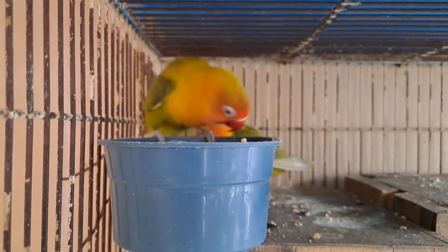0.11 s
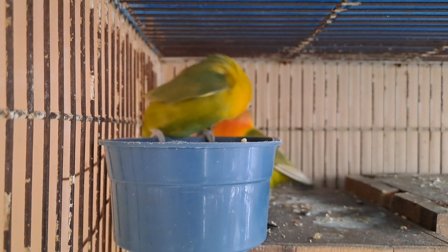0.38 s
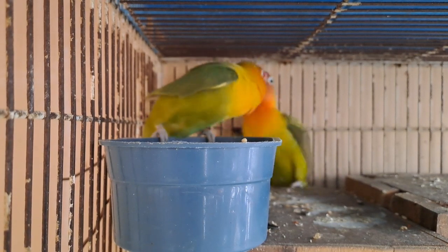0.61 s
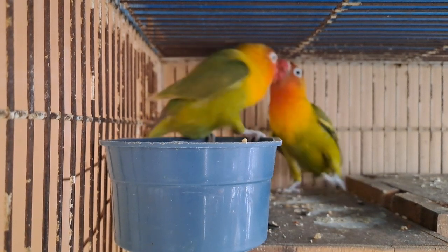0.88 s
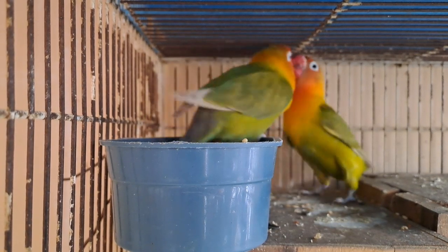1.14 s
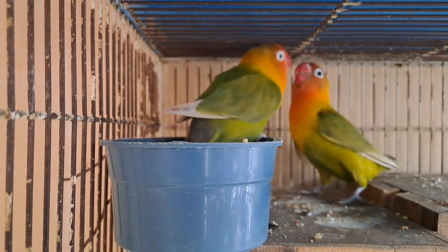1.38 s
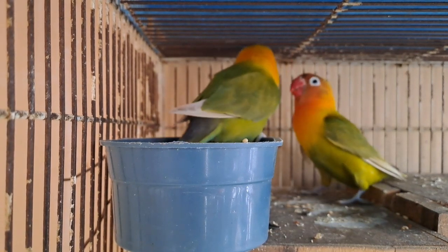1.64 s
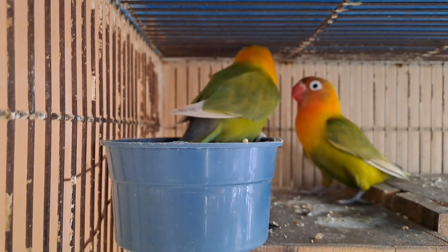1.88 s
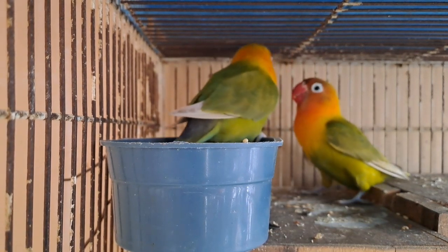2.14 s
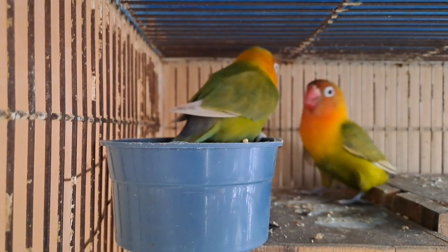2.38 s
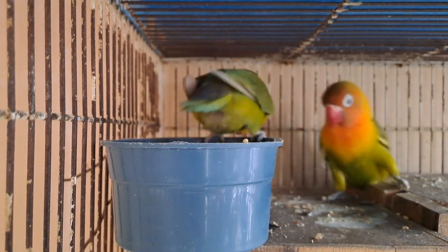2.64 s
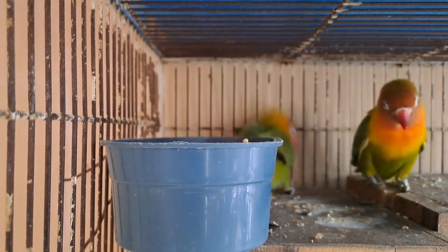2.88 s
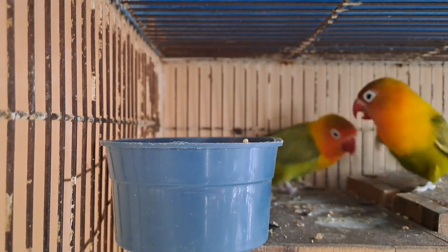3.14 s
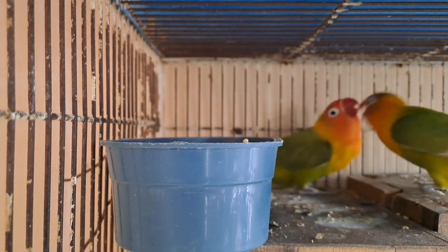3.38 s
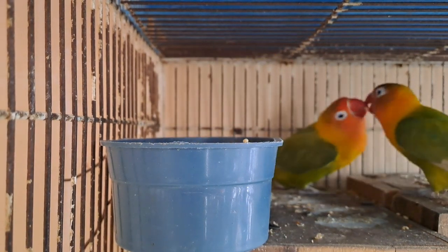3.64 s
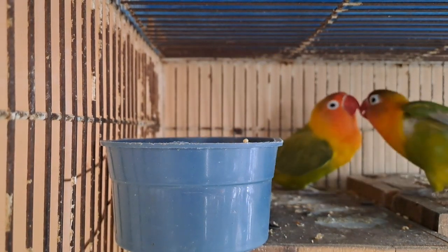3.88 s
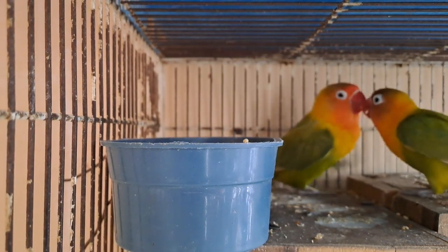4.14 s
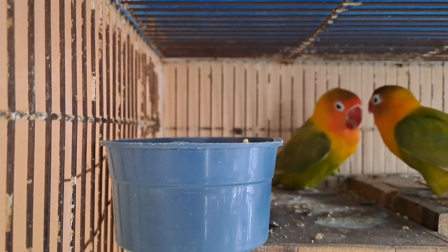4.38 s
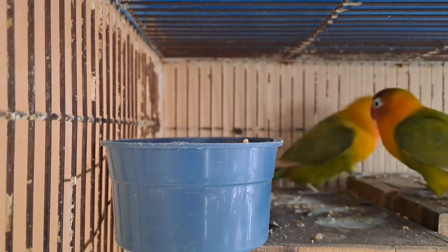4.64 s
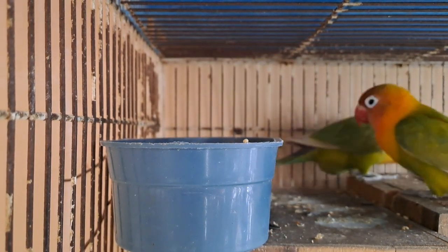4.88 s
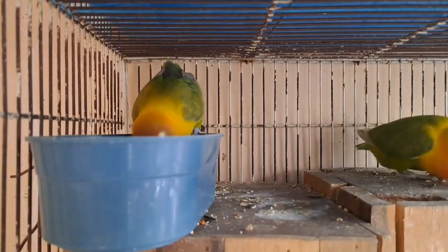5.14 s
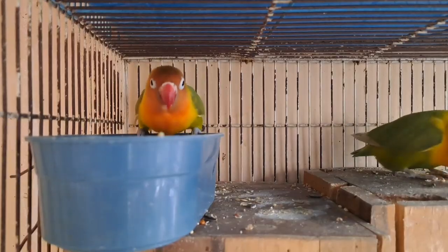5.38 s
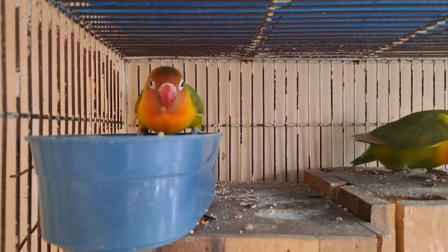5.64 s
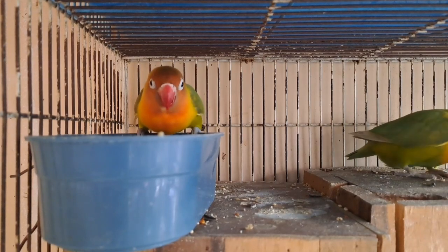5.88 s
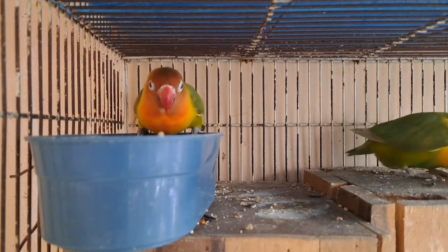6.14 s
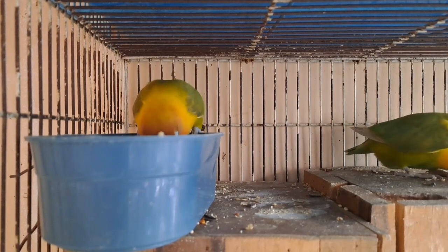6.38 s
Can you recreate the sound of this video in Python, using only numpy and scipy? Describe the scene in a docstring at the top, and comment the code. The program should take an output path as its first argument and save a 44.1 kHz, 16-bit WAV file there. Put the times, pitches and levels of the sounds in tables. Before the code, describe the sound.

Bright, piercing parrot chirps and four quick screeches ring in a small hard cage, giving way to scuffling feet and crisp seed cracking.

```python
"""Small parrots chatter in a wire cage under a hard roof: gliding chirps, rasping screeches, and closing notes
that ring on as echo. Each call is a harmonic series on a moving fundamental; roughness modulates it and adds noise.
Close reflections and a diffuse echo tail follow. Claws, feet, feathers and husks tick as decaying bands of noise.
Faint far whistles are narrowband noise, over a low rumble, rustle and hiss of filtered noise with slow levels."""
import sys
import numpy as np
from scipy import signal
from scipy.fft import rfft, irfft
from scipy.io import wavfile
from scipy.ndimage import uniform_filter1d

SR = 44100
rng = np.random.default_rng(int(sys.argv[2]) if len(sys.argv) > 2 else 0)


def invert_db(level):
    """Linear amplitude ratio for a level in decibels (20 dB per decade), elementwise."""
    return 10 ** (np.asarray(level, dtype=float) / 20)


def generate_wav(signal):
    """Clip the signal to [-1, 1] and save it as 16-bit WAV at the path in sys.argv[1]."""
    frames = np.transpose(np.atleast_2d(signal))
    scaled = np.clip(frames, -1, 1) * 32767
    pcm = np.round(scaled).astype(np.int16)
    wavfile.write(sys.argv[1], SR, pcm)


N = 287091  # samples, about 6.5 s

# rasping screeches, about a third of a second apart: (time [s], length [s], top pitch [Hz],
# reference level [dB], share of the length at the top [0-1], last pitch [Hz])
SCREECHES = [(1.514, 0.14, 3640, -15.5, 0.33, 3550), (1.876, 0.12, 3680, -15.5, 0.52, 2950),
             (2.191, .125, 3860, -16, .52, 3150), (2.532, 0.125, 3760, -13.5, 0.41, 3213)]


def at_hz(points, hz):
    """Spectral interpolation: levels run straight along a logarithmic frequency axis."""
    points = np.array(points)
    return np.interp(np.log(hz + 1), np.log(points[:, 0]), points[:, 1])


def rms_one(x):
    """Normalization to unit mean power."""
    return x / np.sqrt(np.mean(x ** 2) + 1e-20)


def coloured(spectrum, channels=1):
    """Spectral shaping: white noise filtered in the frequency domain, at rms 1."""
    gain = invert_db(at_hz(spectrum, np.fft.rfftfreq(N, 1 / SR)))
    white = rng.standard_normal((channels, N))
    return rms_one(irfft(rfft(white) * gain, N))


def drift(hz):
    """Lowpass random process: two equal poles slow white noise down, at rms 1."""
    r = np.exp(-2 * np.pi * hz / SR)
    white = rng.standard_normal(N + 4000)
    return rms_one(signal.lfilter([1], [1, -2 * r, r * r], white)[4000:])  # skips the onset of the filter


def span(rows, fade_s):
    """Piecewise-linear envelopes: sample range of a table, its columns in time, and a gate that fades both ends."""
    s, *columns = np.transpose(rows)
    i = np.arange(max(int(s[0] * SR), 0), min(int(s[-1] * SR), N))
    t = i / SR
    gate = np.clip(np.minimum(t - s[0], s[-1] - t) / fade_s, 0, 1)
    return i, [np.interp(t, s, c) for c in columns], gate


def sides(pan_db):
    """Interaural level difference: left and right gains, pan_db apart."""
    return invert_db(np.array([[pan_db / 2], [-pan_db / 2]]))


def calls():
    """Frequency and level contours: yields each call's rows, its voice and place, its warble and share of beating."""
    # chirps, one table a syllable: (time [s], pitch [Hz], fundamental level [dB], treble level [dB])
    chirps = [
        [(0.0, 4430, -10.5, -3), (0.016, 3340, -10, -18), (0.026, 1974, -10.5, -12), (0.034, 3606, -14, -28.5),
         (0.042, 4725, -5, -11), (0.056, 4920, -28.5, -27.5)],
        [(0.074, 1410, -38, -32.5), (0.085, 1494, -18.5, -50), (0.097, 1470, -16, -34), (0.103, 1430, -46, -51)],
        [(0.184, 1670, -21, -62), (0.195, 2180, -22.5, -36), (0.206, 1520, -23.5, -54), (0.213, 1600, -28, -51)],
        [(0.224, 2980, -24, -27.5), (0.238, 3140, -39, -50.5)],
        [(0.272, 3250, -13, -35.5), (0.278, 3240, -9, -14.5), (0.3, 2974, -10.5, -6.5),
         (0.318, 3126, -12.5, -14.5), (0.326, 2800, -13, -25.5)],
        [(0.37, 2970, -20, -31), (0.377, 3273, -6, -12), (0.39, 2920, -8.5, -7), (0.41, 2705, -8, -13.5),
         (0.426, 2570, -8, -19.5)],
        [(0.685, 1700, -20, -27), (0.694, 1950, -13.5, -30), (0.702, 3456, -2.5, -14),
         (0.709, 3320, -11, -21.5), (0.714, 2185, -8.5, -21), (0.72, 2230, -9.5, -39)],
        [(0.716, 2300, -12, -31), (0.721, 5110, -19, -24), (0.727, 5440, -27, -26.5), (0.735, 4930, -25, -21),
         (0.745, 3330, -8.5, -15), (0.753, 3030, 1.5, -17)],
        [(0.751, 2984, -22.5, -18.5), (0.757, 5520, -9, -2.5), (0.764, 5940, -14, -9),
         (0.77, 5450, -17.5, -6.5), (0.774, 4050, 0.5, 1), (0.781, 3960, -15, -8)],
        [(0.78, 3990, -10, -23), (0.79, 4640, -12.5, -27), (0.796, 4540, 0, -24.5), (0.804, 4500, -15.5, -24)],
        [(1.186, 3690, -18.5, -41), (1.2, 3300, -24.5, -19), (1.225, 3183, -16, -28),
         (1.266, 2800, -16.5, -19.5)],
        [(1.19, 4530, -27, -43), (1.22, 5270, -15.5, -32), (1.245, 5320, -33, -27), (1.27, 5100, -50, -30.5)],
        [(1.786, 1830, -29.5, -33), (1.795, 2070, -21, -33), (1.807, 2446, -24.5, -20.5),
         (1.818, 2100, -21, -41)],
        [(1.823, 4000, -30, -40.5), (1.8265, 4060, -18.5, -31), (1.829, 4050, -42, -40)],
        [(2.002, 5895, -14.5, -15.5), (2.008, 6290, 3, -20), (2.017, 5800, -17, -27)],
        [(2.864, 2220, -28.5, -29), (2.869, 3845, -10.5, -12), (2.875, 4210, -13, -16),
         (2.884, 2476, -19, -16.5), (2.889, 2570, -10, -22)],
        [(2.889, 4750, -18.5, -36), (2.9, 4760, -20, -35), (2.908, 4016, -11.5, -15.5),
         (2.916, 2680, -12, -2.5)],
        [(2.916, 4980, -14, -23), (2.927, 4890, -12, -19), (2.931, 4020, -16, -34), (2.939, 5030, -11.5, -35)],
        [(2.99, 1416, -27, -41), (2.997, 1504, -30.5, -42), (3.005, 1850, -13, -40), (3.013, 2014, -23, -26.5),
         (3.022, 1953, -20, -26), (3.03, 2450, -15, -32)],
        [(3.095, 2230, -31.5, -33), (3.1, 3780, -7, -12), (3.105, 5500, -23.5, -36.5),
         (3.115, 5595, -24.5, -24), (3.122, 4820, -10.5, 8.5), (3.128, 6880, -12, -22),
         (3.136, 4600, -7.5, -27.5), (3.155, 3725, -9.5, -14), (3.168, 4920, -5, -43.5),
         (3.176, 4980, -8.5, -30)],
        [(3.238, 4960, 0, -36.5), (3.243, 5500, -14, -40), (3.247, 5550, -6, -40), (3.252, 5530, -13.5, -45)],
        [(3.638, 2900, -10.5, -23), (3.643, 3225, -8.5, -7), (3.648, 3093, -5.5, -5.5), (3.66, 3150, -11.5, -7),
         (3.664, 3116, -5, -21.5), (3.667, 2710, -13, -3), (3.672, 2680, -26.5, -22)],
        [(4.45, 1052, -34.5, -66), (4.47, 1065, -32.5, -54), (4.5, 1048, -44, -63)],
        [(5.012, 3377, -24, -48), (5.03, 3480, -14, -24), (5.048, 3290, -5, -34), (5.065, 3337, -24.5, -36),
         (5.09, 3270, -17, -38)],
        [(5.092, 3190, -18.5, -27), (5.1, 3110, -14, -23.5), (5.107, 2936, -13, -29), (5.115, 2700, -14, -29.5),
         (5.13, 2550, -19.5, -29), (5.155, 2580, -16.5, -33)],
        [(5.19, 4800, -15.5, -19.5), (5.196, 4440, -14.5, -10), (5.204, 3670, -21, -8), (5.212, 2830, -29, -24),
         (5.225, 2570, -37, -35)],
        [(5.27, 5800, -20, -35), (5.277, 5400, -2, -39), (5.285, 5200, -16, -40), (5.3, 5250, -11.5, -43),
         (5.318, 5110, -17, -48)],
    ]
    # voice and place of each syllable: (second harmonic re fundamental [dB], roughness [0-1],
    # echo send re voice [dB], left minus right [dB], lag of the left side [ms])
    voices = [(-4.5, 0.25, -15, -0.5, -0.18), (-23, 0.4, -25.5, -1, 0.1), (-8.5, 0.05, -10.5, -2, 0.173),
              (1, 0.14, -8, -7, -0.098), (-17.5, 0, -19.5, 0, -0.024), (-14, 0.13, -17.5, -2.5, 0.288),
              (-15, 0.3, -26, -2, -0.034), (-12, 0.4, -28.5, -3, 0.2), (-14.5, 0.18, -11, -3, -0.021),
              (-12.5, 0.12, 4, 0, -0.025), (-20.5, 0.41, -8, -3, 0.367), (-9, 0.63, 4.5, -7.5, 0.51),
              (-1, 0.49, -24, -8.5, 0.08), (-3.5, .1, -20, -19, 0.24), (-5.5, 0.35, -14, 1, 0.212),
              (3.5, 0.24, -6.5, 1.5, -0.0013), (-1, 0, -20.5, 3, -0.685), (-5.5, 0.6, 0.5, -2, -.023),
              (-13, 0.36, -9.5, 2, -0.0082), (-13.5, 0.12, -4, 1, .001), (-26, 0.25, -9, -6.5, 0.027),
              (2, 0.17, -16, 1.5, 0.05), (-9, 0.33, -11, 0.5, -0.65), (-11, 0.39, -5, 4, -0.42),
              (-14.5, 0.35, -3.5, 4, -0.459), (-24, 0.28, -10, 6, -0.5), (-11, 0.1, -7, 3, -0.726)]
    # pitch deviation by the second vibration, one for each syllable: [share of the pitch]
    warbles = [.015, .01, .01, 0, .045, .045, .01, .01, .012, .015, .02, .04, .01, .01, 0, .025, .03, .035,
               .012, .015, .015, .012, 0, .05, .12, .08, .12]
    for rows, voice, warble in zip(chirps, voices, warbles):
        yield rows, voice, warble, 0.3

    # screech stages start, accent, top, sag, end: (level re reference [dB], treble level re reference [dB])
    arch = [(-8, -24), (6, -6.5), (0.5, -9.5), (-2.5, -6), (-6, -5.5)]
    # the voice of all screeches, columns as in voices
    screech_voice = (-18.5, 0.55, -2.5, -3, -0.55)
    start_hz, accent_hz, accent_s = 2450, 2950, 0.015
    sag_halfway = 0.23  # share of the fall in pitch done half way from top to end
    for s, length, hz, db, top, last_hz in SCREECHES:
        times = s + np.array([0, accent_s, top * length, (1 + top) / 2 * length, length])
        pitches = [start_hz, accent_hz, hz, hz + sag_halfway * (last_hz - hz), last_hz]
        rows = [(t, pitch, db + re_db, db + treble_db)
                for t, pitch, (re_db, treble_db) in zip(times, pitches, arch)]
        yield rows, screech_voice, 0.04, 0.55

    # closing notes that ring on as echo: (time [s], pitch [Hz], level [dB], slide [s], steady part [s],
    # left minus right [dB], pitch it slides in from [Hz], second harmonic re fundamental [dB])
    closing_notes = [(1.265, 3412, -19, .035, 0.015, -9, 3810, -15.5),
                     (1.629, 3000, -16, 0.017, 0.031, -12.5, 2646, -34),
                     (1.995, 2934, -17, 0.013, 0.0079, -5.5, 2680, -33),
                     (2.311, 2970, -15, .014, 0.02, -10, 2600, -29),
                     (2.656, 3045, -16.5, 0.022, 0.013, 2, 2610, -37)]
    slide_db = 6.5  # how much louder the slide starts
    drop_db, drop_s, tail_db, tail_s = -10.5, 0.018, -15.5, 0.24  # a quick drop, then a slow echo tail
    treble_re_db, rough, echo_db, left_late_ms = -17, 0.088, 4, 0.26
    for s, hz, db, slide, steady, pan_db, from_hz, second_db in closing_notes:
        times = s + np.cumsum([0, slide, steady, drop_s, tail_s])
        levels = db + np.cumsum([slide_db, -slide_db, 0, drop_db, tail_db])
        pitches = [from_hz, hz, hz, hz, hz]
        rows = [(t, pitch, level, level + treble_re_db) for t, pitch, level in zip(times, pitches, levels)]
        yield rows, (second_db, rough, echo_db, pan_db, left_late_ms), 0.005, 0.65


def parrots():
    """Vibrating membrane: a harmonic series with frequency and amplitude modulation; roughness adds noise."""
    # rasp spectrum: (frequency [Hz], relative density [dB per Hz])
    rasp_spectrum = [(710, -60), (1200, -40), (1640, -27.5), (1990, -23), (2560, -8), (3700, -3.5),
                     (5130, 2.5), (5590, -44.5), (6720, -1), (10000, -5), (10900, -16.5), (15000, -13),
                     (16000, -27)]
    # colour of throat and beak on the upper harmonics: (frequency [Hz], gain [dB])
    beak_colour = [(3500, 2), (6000, 6), (9000, -6), (11800, 2), (13500, 0.5), (15500, -42.5)]
    jitter, jitter_hz = 0.098, 516  # rms share of the pitch at full roughness, and corner
    flutter_db, flutter_hz = -0.5, 147  # level shake at full roughness, and corner
    blur_hz, beat_hz = 336, 85  # corners: strength of each harmonic, uneven beating
    pulse_hz, pulse_depth = 286.6, 0.12  # second vibration: mean rate, level depth at full roughness
    overtone_db, rasp_db = -5, 9.5  # third and higher harmonics, and rasp, re treble level

    direct, echo_send = np.zeros((2, N)), np.zeros(N)
    shake, flutter, blur = drift(jitter_hz), drift(flutter_hz), drift(blur_hz)
    rasp = coloured(rasp_spectrum)[0]
    treble = signal.sosfilt(signal.butter(4, 9000, "high", fs=SR, output="sos"), rasp)
    rasp = rasp / treble.std()  # rms 1 in the treble alone
    pulse = np.sin(2 * np.pi * np.cumsum(pulse_hz * (1 + 0.0614 * drift(33.9))) / SR)
    beating = drift(beat_hz) + 1j * drift(beat_hz)
    for rows, (second_db, rough, echo_db, pan_db, left_late_ms), warble, beat in calls():
        i, (hz, db, treble_db), gate = span(rows, fade_s=0.0015)
        rough = np.clip(rough, 0, 1)
        bend = 1 + jitter * rough ** 2 * shake[i] + warble * pulse[i]
        phase = 2 * np.pi * np.cumsum(hz * bend) / SR
        # a steady and a random phasor add up: level and phase beat together
        beats = np.sqrt(1 - beat ** 2) + beat * beating[i] / np.sqrt(2)
        phase = phase + np.angle(beats)
        voice = rough ** 2 * invert_db(treble_db + rasp_db) * rasp[i]
        for k in range(1, 9):
            if k < 3:
                level_db = (db, db + second_db)[k - 1]
            else:
                level_db = treble_db + overtone_db + at_hz(beak_colour, k * hz)
            audible = np.clip((17000 - k * hz) / 1000, 0, 1)  # fades harmonics out from 16 to 17 kHz
            blurred = np.clip(2.76 * rough ** 2 * np.sqrt(k - 0.6), 0, 1)
            # each harmonic reads the blur at its own offset
            strength = np.sqrt(1 - blurred ** 2) + blurred * blur[(i + 997 * k) % N]
            voice += np.sqrt(2) * audible * invert_db(level_db) * strength * np.sin(k * phase)
        voice *= gate * invert_db(flutter_db * rough ** 2 * flutter[i])
        voice *= 1 + np.minimum(pulse_depth * rough, 1) * pulse[i]
        voice *= np.abs(beats)
        late = left_late_ms / 2000 * SR  # half the lag on each side, in samples
        pair = np.array([np.interp(i - late, i, voice), np.interp(i + late, i, voice)])
        direct[:, i] += pair * sides(pan_db)
        echo_send[i] += voice * invert_db(echo_db)
    return direct, echo_send


def cage(x):
    """Early reflections: delayed, softer copies of the mono sum, every other one inverted, cause comb filtering."""
    # close reflections off roof, floor, bars and walls: (delay [ms], left gain [dB], right gain [dB])
    reflections = [(.55, -26.5, -10.5), (1.05, -15, -29), (1.9, -11.5, -23), (2.7, -24, -9.5),
                   (4.3, -7, -18), (6.1, -22, -16), (9.2, -9.5, -22.5), (12.7, -21, -12)]
    out, i, mono = x.copy(), np.arange(N), x.mean(axis=0)
    for k, (late_ms, left_db, right_db) in enumerate(reflections):
        copy = np.interp(i - late_ms * SR / 1000, i, mono, left=0)
        out += (-1) ** k * invert_db(np.array([[left_db], [right_db]])) * copy
    return out


def echo(x):
    """Diffuse reverberation: convolution with noise, separate on each side, that decays exponentially by band."""
    # late decay by octave band: (centre frequency [Hz], time to fall 60 dB [s])
    decay_times = [(1500, 0.7), (3000, 0.59), (6000, .5), (12000, 0.41)]
    front_db, front_t60_s = -1, 0.1  # an added early part that dies faster
    t, response = np.arange(int(0.8 * SR)) / SR, 0
    white = rng.standard_normal((2, len(t)))
    for hz, t60 in decay_times:
        edges = [hz / np.sqrt(2), hz * np.sqrt(2)]
        band = signal.sosfilt(signal.butter(2, edges, "band", fs=SR, output="sos"), white)
        response = response + band * (invert_db(-60 * t / t60) + invert_db(front_db - 60 * t / front_t60_s))
    response = response / np.sqrt(np.sum(response ** 2) / 2)
    return signal.fftconvolve(x[None], response, axes=1)[:, :N]


def swells(events, rise_s, fall_s):
    """Power envelope: each event rises, holds to the end of its length and decays exponentially; powers add."""
    t = np.arange(N) / SR
    return sum(invert_db(2 * db) * np.clip((t - s) / rise_s, 0, 1) ** 2
               * np.exp(-2 * np.maximum(t - s - length, 0) / fall_s)
               for s, length, db in events)


def sinking(x):
    """Dynamic compression: a gain that falls with the loudness of the calls and recovers at a steady rate."""
    from_db, share, back_db_per_s = -32, 0.34, 233.5  # threshold, dB down per dB over, fall of the peak loudness
    db = 10 * np.log10(uniform_filter1d(np.mean(x ** 2, axis=0), size=400) + 1e-9)
    slope = back_db_per_s * np.arange(N) / SR
    peak_db = np.maximum.accumulate(db + slope) - slope
    return invert_db(-share * np.maximum(peak_db - from_db, 0))


def background(spectrum, column, swell, patchy_db):
    """Partly coherent noise field: mid and side noise, alike in the bass, with slow level, swells and flicker."""
    # side re mid: (frequency [Hz], level difference [dB])
    likeness = [(30, -13.5), (60, -11.5), (110, -12), (200, -8.5), (380, -7), (700, -2), (1290, 3.5),
                (2380, -1.5), (4400, 0), (8120, 1), (15000, 0)]
    # slow mid level: (time [s], rumble [dB], rustle [dB], hiss [dB], thin top hiss [dB])
    slow_levels = np.array([(0, -36, -47, -16, -56.5), (.12, -35, -43, -44.5, -54),
                            (0.499, -34, -44.5, -42, -45), (.9, -38, -46.5, -67.5, -66),
                            (1.2, -36, -45, -42.5, -50), (2.0, -33.5, -47, -41, -58),
                            (3.001, -40, -48.5, -41, -48), (3.399, -36.5, -46.5, -58, -49.5),
                            (3.75, -38.5, -52, -58, -67.5), (4.199, -36.5, -48, -50.5, -49),
                            (4.6, -32, -47, -56, -54.5), (4.948, -37, -55.5, -49.5, -43.5),
                            (5.06, -23, -25, -64, -79), (5.449, -35, -45, -53.5, -54),
                            (5.8, -30.5, -43.5, -50, -51.5), (6.17, -27.5, -40, -47.5, -42),
                            (6.51, -28.5, -42.5, -46.5, -53.5)])
    mid, side = coloured(spectrum, channels=2)
    side = irfft(rfft(side) * invert_db(at_hz(likeness, np.fft.rfftfreq(N, 1 / SR))), N)
    db = np.interp(np.arange(N) / SR, slow_levels[:, 0], slow_levels[:, column])
    level = np.sqrt(invert_db(2 * db) + swell) * invert_db(patchy_db * drift(9.7))
    return level * (mid + side * [[1], [-1]])


def stirred_air(direct):
    """Superposed noise bands: rumble and rustle swell as birds move and sink under calls; hiss swells with rasps."""
    # four noise spectra: (frequency [Hz], relative density [dB per Hz])
    rumble = [(12, -32.5), (20, -2), (48, 5.5), (81, -2), (129, -4.5), (195, -1.5), (216, -10),
              (264, -23.5), (297, -13.5), (330, -45), (430, -48), (730, -120)]
    rustle = [(130, -19.5), (220, 2), (429, 1.5), (853, -2.5), (1170, -8), (1830, -11), (3000, -28),
              (3900, -47.5), (6600, -120)]
    hiss = [(880, -60.5), (1500, -17.5), (1890, -5.5), (2470, 0), (3900, 1), (4870, 1), (7500, -10.5),
            (9750, -4), (16500, -120)]
    top_hiss = [(4120, -50), (7000, -1), (8260, -5), (9430, -29), (10200, -10.5), (12000, -2),
                (14700, -8.5), (16000, -5)]
    # the birds shift about and stir the air: (time [s], length [s], rustle level [dB])
    bird_moves = [(1.06, 0.23, -36.5), (1.38, 0.18, -36), (1.79, 0.046, -36.5), (2.17, 0.043, -36),
                  (2.43, 0.15, -40), (2.75, 0.086, -40.5), (3.08, 0.036, -30.5), (4.11, 0.043, -45.5),
                  (4.68, 0.27, -40), (4.82, 0.12, -39), (5.05, 0.15, -39)]
    # bursts of hiss apart from the screeches: (time [s], length [s], hiss level [dB])
    hiss_bursts = [(1.33, 0.0209, -37.5), (5.19, 0.058, -21.5)]
    rumble_re_db, hiss_re_db, top_re_db = 3.5, -4, -5  # re rustle swell, re screech, re hiss swell
    moves = swells(bird_moves, rise_s=0.017, fall_s=0.0091)
    screech_hiss = [(s, length, db + hiss_re_db) for s, length, hz, db, *shape in SCREECHES]
    rasps = swells(screech_hiss, rise_s=0.1, fall_s=0.11)
    rasps += swells(hiss_bursts, rise_s=0.0093, fall_s=0.03)
    air = background(rumble, swell=moves * invert_db(2 * rumble_re_db), column=1, patchy_db=0.5)
    air = sinking(direct) * (air + background(rustle, swell=moves, column=2, patchy_db=1.0))
    air += background(hiss, swell=rasps, column=3, patchy_db=3.5)
    air += background(top_hiss, swell=rasps * invert_db(2 * top_re_db), column=4, patchy_db=3.5)
    return air


def whistles(tables, width_hz):
    """Multipath spreading: echoes smear far tones into narrowband noise, independent on each side."""
    out = np.zeros((2, N))
    smear = np.array([drift(width_hz) + 1j * drift(width_hz) for side in out])
    for rows in tables:
        i, (hz, db), gate = span(rows, fade_s=0.023)
        carrier = np.exp(2j * np.pi * np.cumsum(hz) / SR)
        out[:, i] += gate * invert_db(db) * np.real(smear[:, i] * carrier)
    return out


def far_whistles():
    """Frequency glides far off: the higher whistles are smeared more widely than the lower ones."""
    # faint far whistles, both lists: (time [s], pitch [Hz], level [dB])
    high_whistles = [
        [(.55, 4700, -50), (.62, 5200, -45), (.69, 5500, -45)],
        [(3.92, 4400, -58), (4.05, 5000, -52), (4.15, 5500, -50), (4.25, 5600, -52), (4.36, 5700, -58)],
        [(6.1, 4000, -58), (6.18, 4700, -50), (6.3, 5100, -41), (6.4, 5450, -38), (6.52, 5750, -38)],
    ]
    low_whistles = [
        [(.4, 1226, -38.5), (.8, 1292, -51), (.95, 1296, -43.5), (1.3, 1268, -47.5), (1.6, 1300, -47),
         (2.0, 1328, -38), (2.3, 1375, -50)],
        [(3.2, 1312, -55), (3.45, 1235, -48), (3.65, 1260, -47), (3.8, 1280, -53), (3.95, 1322, -46),
         (4.02, 1250, -55)],
        [(5.75, 3800, -54), (5.775, 3820, -53), (5.83, 3750, -52)],
        [(5.48, 1920, -57), (5.57, 1884, -46), (5.66, 1830, -48), (5.77, 1900, -50), (5.86, 1865, -44),
         (6.05, 1820, -52)],
    ]
    return whistles(high_whistles, width_hz=260.0) + whistles(low_whistles, width_hz=85.0)


def knocks(events, t60, spread):
    """Impact excitation: each contact is exponentially decaying noise, bandpassed about its own centre."""
    out, t = np.zeros((2, N)), np.arange(int(0.15 * SR)) / SR
    for s, db, hz in events:
        edges = np.clip([hz / spread, hz * spread], 50, 0.45 * SR)
        burst = rng.standard_normal((2, len(t))) + rng.standard_normal(len(t))  # partly alike on both sides
        burst = burst * invert_db(-60 * t / max(t60, 0.005))
        burst = signal.sosfilt(signal.butter(2, edges, "band", fs=SR, output="sos"), burst)
        i = round(s * SR)
        out[:, i:i + len(t)] += (invert_db(db) * burst / np.abs(burst).max())[:, :N - i]
    return out


def contacts_of_birds():
    """Impact damping: each kind of contact has its own band, bandwidth and decay time."""
    # feet on the tub and the boards: (time [s], peak level [dB], centre frequency [Hz])
    taps = [(0.523, -30, 443), (1.057, -30, 1060), (1.071, -29, 925), (1.112, -24, 810), (1.389, -30, 1030),
            (2.866, -25.5, 990), (3.094, -13.5, 1600), (3.237, -27, 1740), (4.115, -34, 437),
            (5.069, -16.5, 544), (5.099, -19, 535), (5.159, -24, 790), (5.323, -25.5, 930),
            (5.36, -31.5, 1280), (5.418, -28.5, 680), (5.503, -27, 854), (5.525, -37, 650),
            (5.553, -33, 616), (5.601, -35, 615), (5.658, -27, 600), (5.685, -28, 830), (5.73, -33, 666),
            (6.277, -27, 1575), (6.492, -23.5, 1610)]
    # landings on the boards: (time [s], peak level [dB])
    thuds = [(2.8, -45), (4.718, -31), (4.832, -14.5), (5.038, -27)]
    # claws on the wire: (time [s], peak level [dB])
    claws = [(0.5227, -23.5), (1.0355, -24.5), (3.24, -17), (3.5369, -36.5), (4.117, -32.5), (4.9018, -8),
             (4.9144, -18), (4.9995, -22), (5.3585, -14.5)]
    # feathers brush the bars: (time [s], peak level [dB])
    brushes = [(1.057, -21), (1.0673, -15.5), (3.4126, -25), (3.4394, -24), (3.8694, -33), (4.6835, -30),
               (4.817, -28.5), (4.861, -25), (6.2042, -17.5)]
    # seed husks crack: (time [s], peak level [dB])
    husks = [(1.112, -40), (1.1725, -37), (5.1642, -12), (5.717, -24.5), (5.8471, -15.5), (5.909, -30),
             (5.9888, -31), (6.0305, -20), (6.034, -28), (6.091, -13), (6.097, -13), (6.1315, -23),
             (6.1615, -10), (6.1655, -15), (6.2532, -13.5), (6.2764, -9.5), (6.4906, -12.5)]
    contacts = knocks(taps, t60=0.052, spread=1.15)
    # events, centre [Hz], time to fall 60 dB [s], band edges as a ratio to the centre
    for rows, hz, t60, spread in ((thuds, 199, 0.15, 1.12), (claws, 5800, 0.0367, 2.2),
                                  (brushes, 6300, 0.14, 2.2), (husks, 14300, 0.0245, 1.4)):
        contacts += knocks([(*row, hz) for row in rows], t60, spread)
    return contacts


def scene():
    """Linear superposition of birds, reflections, echo, contacts, far whistles and background."""
    direct, echo_send = parrots()
    contacts = contacts_of_birds()
    far = far_whistles()
    air = stirred_air(direct)
    tail = echo(echo_send + invert_db(-21.0) * contacts.mean(axis=0))
    return cage(direct) + tail + contacts + far + air


def top_cut(x):
    """Nothing passes above the cut-off."""
    return signal.sosfilt(signal.butter(12, 16640, fs=SR, output="sos"), x)


def record(dry):
    """Saturation and band limiting: peaks are rounded, the top is cut, and the loudest peaks clip."""
    soft_top, cut_hz = 1.2, 16500  # amplitude limit of the rounding; stopband edge
    rounded = soft_top * np.tanh(dry / soft_top)
    heard = signal.sosfilt(signal.cheby2(10, 40, cut_hz, fs=SR, output="sos"), rounded)
    return top_cut(np.clip(heard, -1, 1))


dry = scene()
out = record(dry)
generate_wav(out)
```